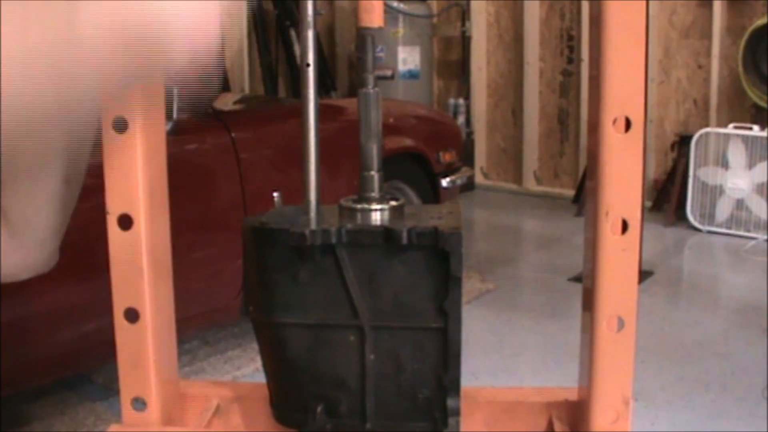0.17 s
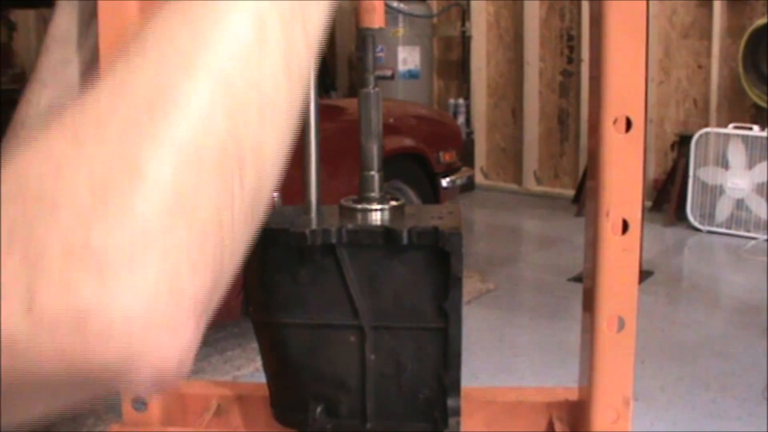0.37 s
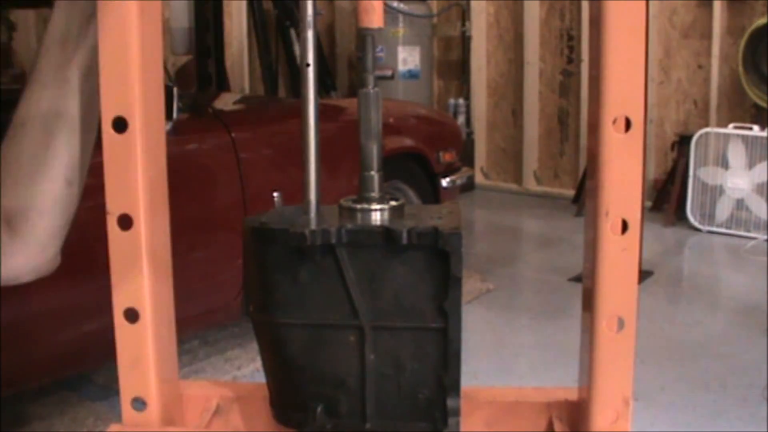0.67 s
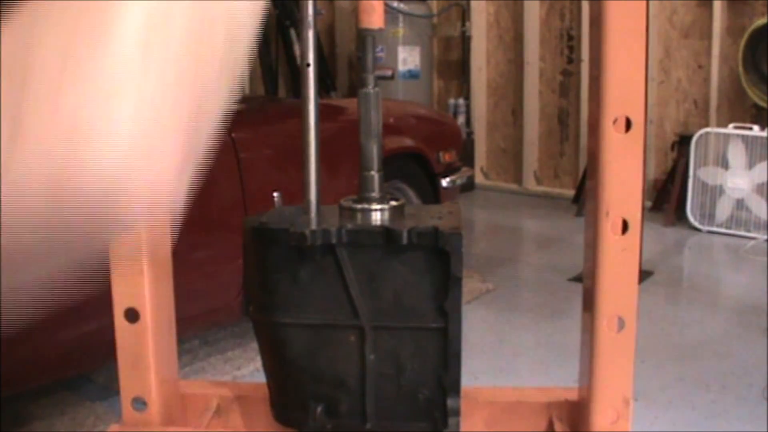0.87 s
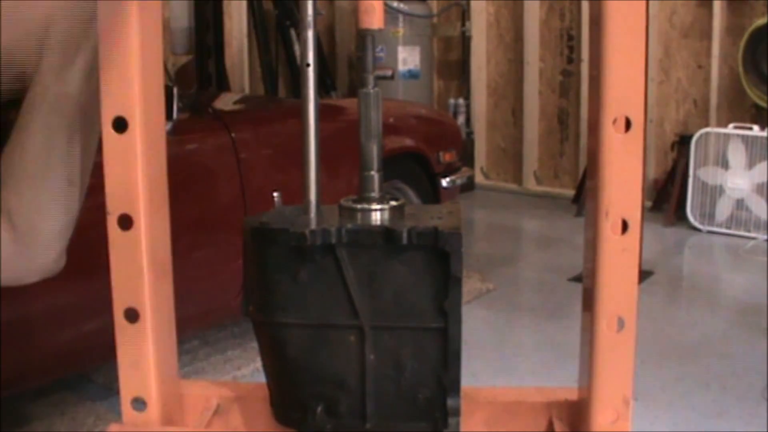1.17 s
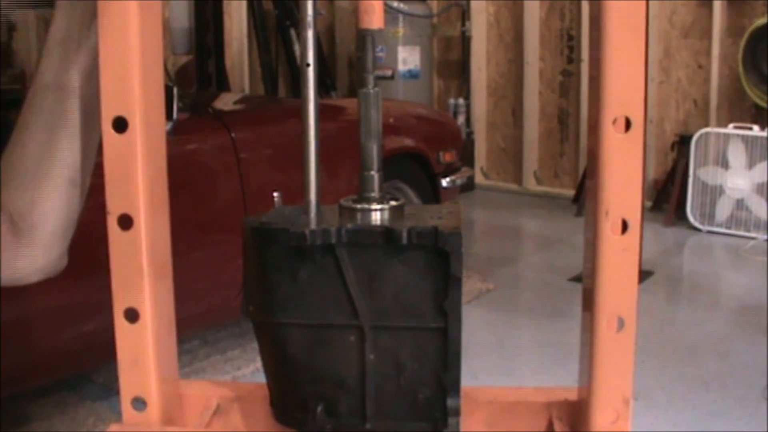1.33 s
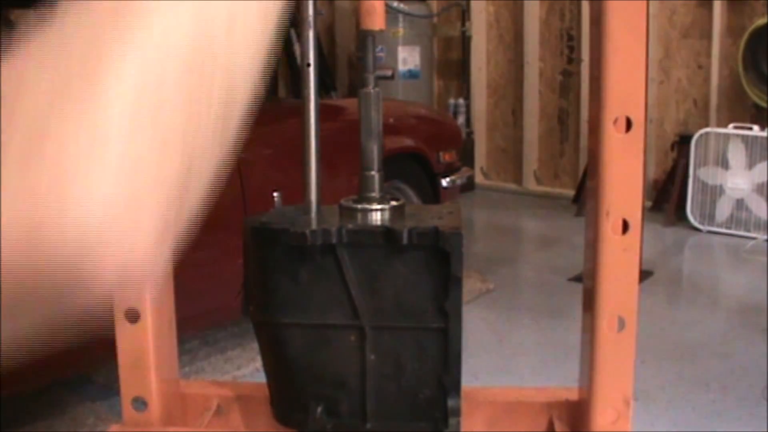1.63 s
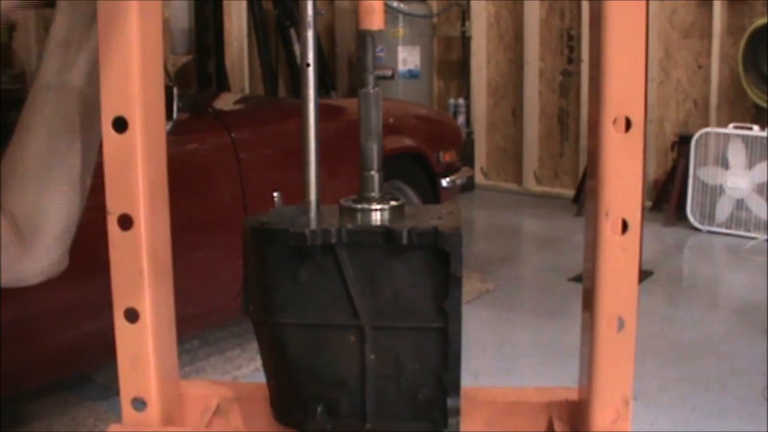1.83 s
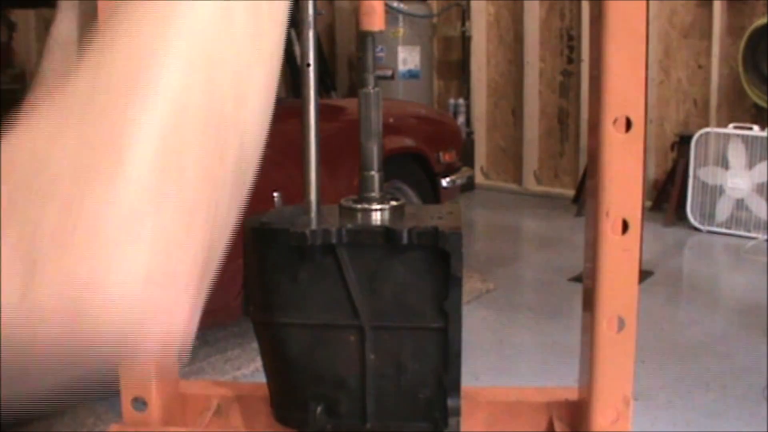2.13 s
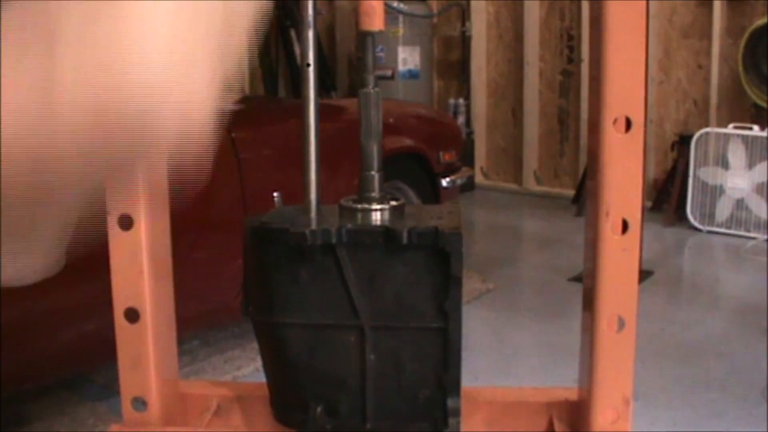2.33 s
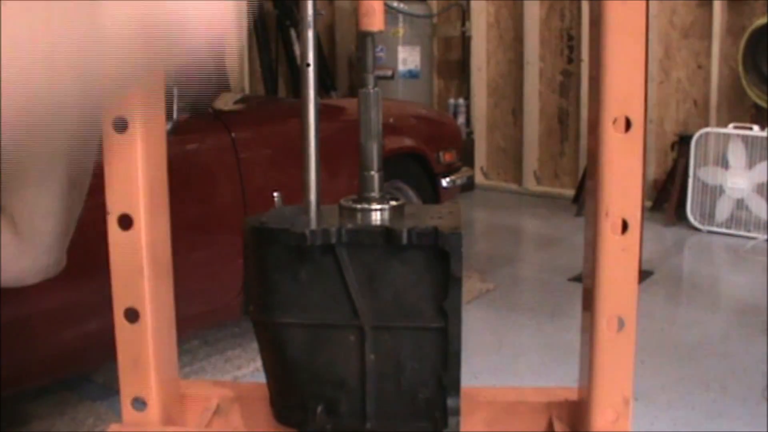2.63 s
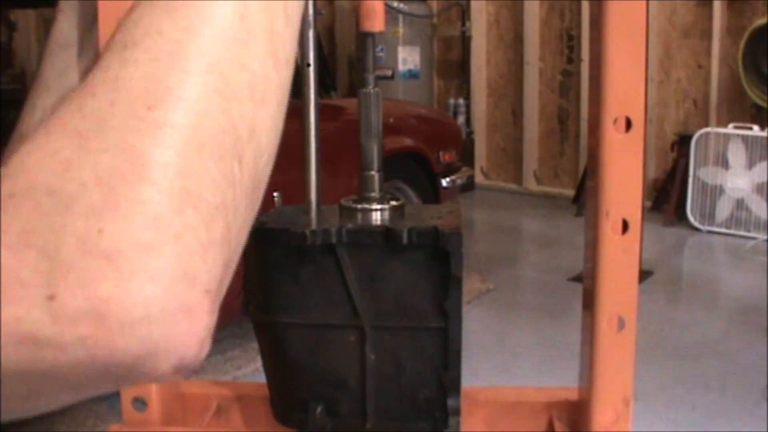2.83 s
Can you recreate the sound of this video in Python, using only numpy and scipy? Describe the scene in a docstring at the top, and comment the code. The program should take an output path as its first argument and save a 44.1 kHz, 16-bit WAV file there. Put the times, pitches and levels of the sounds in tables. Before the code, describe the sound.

A steel jack lever is pumped quickly by hand, each stroke a cluster of sharp clacks, ticks and scrapes with bright clanks at the turns, close to a small camera microphone in a garage.

```python
"""Bottle jack pumped by hand

A hand pumps the steel lever of a bottle jack in a shop press, in a garage, a small camera close by.
Loose linkage ticks, clacks and scrapes; the lever clanks at the turn of each stroke: coloured noise bursts.
Bursts feed a dense noise tail; a short pulse with each burst rings decaying steel modes.
A swept sine makes the low frame groan; filtered noise and drifting sines make the faint rumble and hum."""
import sys
import numpy as np
from scipy import signal
from scipy.fft import rfft, irfft
from scipy.io import wavfile
from scipy.ndimage import uniform_filter1d

SR = 44100
rng = np.random.default_rng(int(sys.argv[2]) if len(sys.argv) > 2 else 0)


def transcribe(u):
    """Save the signal u as a 16-bit wav file named by the first command-line argument.

    u: samples, shape (n,) or (channels, n), limited to [-1, 1]; the rate is SR.
    q: integer samples, one column per channel.
    """
    v = np.clip(np.atleast_2d(u).T, -1, 1)
    q = np.round(v * 32767).astype(np.int16)
    wavfile.write(sys.argv[1], SR, q)


N = 132300
LEAD = int(0.15 * SR)  # samples of run-in, cut off after the ringing is built

# Centres of the five colour bands [f/Hz]
BANDS_HZ = [500, 1400, 3600, 7800, 14500]
# Linkage ticks and clacks [t/s, direct crack peak/dB, relative ringing level/dB in five bands, decay/ms]
LINK_BLOWS = [(0.2127, -7, -28, -44, -27, -31, -72, 3.5), (0.2294, 1.5, -51, -26, -21.5, -4.5, -81, 1.5),
              (0.239, -7.5, -38, -56, -17, -60, -34, 2.5), (0.2536, -13, -22.5, -67, -21, -13, -29, 5.3),
              (0.2636, -3, -30.5, -11, -12, -18, -54, 1.6), (0.2815, -30, -31, -25, -46, -35, -62, 1.5),
              (0.5387, -10, -30, -22.5, -21, -16, -26.5, 11), (0.5664, -18, -33.5, -33, -25, -31, -43, 5.2),
              (0.7222, -17.5, -33, -38.5, -34.5, -35.5, -54, 4.0),
              (0.8108, -9.5, -35, -38, -35, -24.5, -63, 6.1), (0.84, 0, -53, -32.5, -19, -13, -53, 2.4),
              (0.8647, -1.5, -54, -42, -25.5, -25, -38, 4.8),
              (0.8731, -1, -24.5, -17.5, -14, -11, -26, 1.4),
              (1.1049, -13.5, -23.5, -34, -25.5, -30, -57, 2.6),
              (1.1357, -23, -40, -23, -32, -30, -44, 3.2), (1.1591, -7.5, -28, -23, -23, -16, -34, 2.2),
              (1.1922, -21, -60, -35, -29, -59, -61, 12), (1.2067, -8, -31, -34, -35, -20, -57, 1.9),
              (1.4274, -3.5, -28, -28, -23.5, -14.5, -66, 6.4),
              (1.4512, 3, -49, -34, -11.5, -9.5, -64, 1.33), (1.4561, -11.5, -28, -28, -31, -43, -34, 7.7),
              (1.4755, -11, -46, -7.5, -49, -8.5, -22, 4.0), (1.483, 2, -24, -25.5, -8, -8.5, -55, 1.3),
              (1.7324, -0.5, -54, -25, -28, -11, -64, 6.4), (1.7389, -21, -26.5, -38, -18.5, -11, -27, 1.3),
              (1.7524, -3.5, -59, -17, -17.5, -12.5, -22.5, 3.2),
              (1.8259, -14, -46, -27, -31, -28, -55, 1.7), (2.0118, -17, -55, -26.5, -27, -30, -37, 4.5),
              (2.0235, -9.5, -60, -53, -42, -25, -71, 2.4), (2.047, -1, -33.5, -30, -15.5, -18, -67, 5.2),
              (2.0664, -14, -29, -38, -55, -39, -39, 4.0), (2.0718, 2, -36, -40, -18, -7.5, -28.5, 2.4),
              (2.0821, -3, -20.5, -16.5, -21, -12.5, -21, 4.0), (2.364, -8, -56, -26, -21.5, -13, -35, 1.7),
              (2.3854, -13, -42, -18, -19.5, -17.5, -35, 5.7),
              (2.4396, -10.5, -32, -28.5, -28, -27.5, -41, 2.6), (2.601, -29, -64, -36, -48, -44, -72, 2),
              (2.6659, -37, -59, -23, -45, -36, -62, 1.3), (2.6751, -8.5, -29.5, -46, -30.5, -27, -60, 2.9),
              (2.7075, -5, -33, -27, -28, -13, -31, 6.2), (2.7134, -15, -22.5, -16.5, -14, -10, -29, 5.5),
              (2.972, -34, -30, -34, -42, -35, -63, 5.5)]
# Lever clanks at the turn of each stroke [t/s, crack peak/dB, five ringing levels/dB, decay/ms]
CLANK_BLOWS = [(0.3956, 0, -40, -44, -37, -44, -72, 4.5), (0.4016, -5, -20.5, -15.5, -6.5, -11.5, -46, 4.6),
               (1.0485, -8, -33.5, -25.5, -22, -30.5, -57, 8.4), (1.631, 1, -33, -24, -16.5, -24, -48, 5.6),
               (1.6369, -6, -18, -14, -7, -13.5, -44, 2.4), (2.2461, 0, -34, -17.5, -14.5, -17, -42, 8.8),
               (2.2521, -0.5, -18, -17.5, -10, -18.5, -45, 2)]
# Clack just before the start [t/s, crack peak/dB, five ringing levels/dB, decay/ms]
EARLIER_BLOWS = [(-.09, -12, -16, -17.5, -12.5, -9.5, -20, 3.5)]
# Scraping rattles of loose parts, slower to swell than the clacks
# [t/s, crack peak/dB, five ringing levels/dB, decay/ms]
SCRAPE_BLOWS = [(0.2094, -11.5, -53, -43, -33, -29, -61, 3.2), (0.246, -14, -50, -32, -24, -30, -39, 6.),
                (0.529, -14, -59, -34, -44, -38, -45, 10), (0.8078, -14.5, -55, -30, -30, -31, -51, 5.5),
                (0.853, -20, -55, -24, -24, -41, -50, 6.), (.880, -14, -45, -26, -32, -27, -50, 9.3),
                (1.149, -15, -44, -42, -44, -37, -41, 8.), (1.187, -24, -56, -44, -22, -44, -58, 7),
                (1.4255, -14, -56, -40, -34, -38, -46, 4.), (1.491, -29, -53, -32, -28, -38, -50, 9.),
                (2.012, -10.5, -55, -47, -35, -25, -64, 3.7), (2.378, -19, -50, -42, -35, -27, -47.5, 6.5),
                (2.6664, -9.5, -57.5, -40, -25, -29, -50, 2.7), (2.721, -9, -37, -27, -30, -23, -52, 29)]
# Steel modes of the linkage [f/Hz, relative level/dB, t60/s]
LINK_MODES = [(270.4, 9.5, 0.45), (454, -2.5, 0.58), (780, 8.5, 0.24), (1048, 5, 0.74), (1153, -4.5, 0.75),
              (1498, 7, 0.46), (1421, -3, 1), (1434, -1.5, 1), (2783, 10, 0.22), (3074, 10, 0.21),
              (3100, 8, 0.14), (3270, 11.5, 0.15), (3974, 9, 0.27), (4186, 10, 0.25), (4900, 10, .35),
              (6650, -15, 0.13), (7430, -13, 0.067), (8750, 19.5, 0.053), (10000, 11, 0.15)]
# Steel modes of the lever [f/Hz]
CLANK_MODES_HZ = [441, 1040, 1109, 1455, 1774, 1960, 2855, 3110, 3226, 3452, 3666, 4032, 4186, 4484, 5766,
                  8400]
# Ring of each lever mode [relative level/dB, t60/s]
CLANK_RING = [(-3, 0.49), (-5, 0.33), (-8.5, 0.72), (-7, 0.67), (6.5, 0.34), (-1.5, 0.42), (-2, 0.41),
              (-11, 0.25), (-8, 0.26), (4.5, .25), (-4.5, 0.16), (2.5, 0.29), (-8, 0.23), (-8.5, 0.63),
              (-1, 0.4), (-11, 0.24)]
# Dense ringing and room decay [f/Hz, t60/s]
TAIL_T60 = [(300, 0.6), (1400, 0.72), (3700, 0.57), (8000, 0.32), (13000, 0.34)]
# Low groan of the loaded frame [t/s, f/Hz, level/dB]
GROAN_TRACK = [(2.7, 289, -43), (2.75, 260, -35.5), (2.778, 292, -33), (2.896, 327, -45), (2.94, 231, -56),
               (2.95, 241.5, -67)]
# Room noise spectrum [f/Hz, relative level/dB per Hz]
FLOOR_SPECTRUM = [(18, -43), (30, -24.5), (210, 1), (345, 0), (801, -12), (1070, -22), (1220, 2.5),
                  (1430, -3), (1860, -14.5), (2830, -16.5), (4910, -16.5), (14800, -24), (16000, -44)]
# Hum tones [f/Hz, level/dB, line width/Hz]
HUM_TONES = [(39, -55, 4.4), (64, -57, 1.6), (103.8, -49.5, 2.36), (131, -52.5, 3.1), (433.7, -48.5, 4.7)]
# Stereo width: gain on the side signal [f/Hz, level/dB]
SIDE_COLOUR = [(60, -11), (250, -10.5), (700, -1.5), (3000, -1.5), (8000, -8), (13000, 0)]
# Microphone response [f/Hz, level/dB]
MICROPHONE = [(100, -7), (1500, -8), (2300, -10), (3300, -4), (4200, -4.5), (5500, -10), (8300, -5.5),
              (10300, -5), (12400, -19), (14000, -10), (15500, -5)]

RISE_MS, SCRAPE_RISE_MS = 0.82, 3.4
GRIT_DB = 3.5  # rms unevenness of a burst
BASS_CUT_DB = -11.5  # at 120 Hz, relative to the lowest band: blows carry little bass
CRACK_LO_HZ, CRACK_HI_HZ = 1300, 15600  # the direct crack is thin
TAIL_DB, LINK_MODES_DB, CLANK_MODES_DB = -6, -9, -7.5
TAIL_RISE_S = 0.0013
LINK_SHIMMER_HZ, CLANK_SHIMMER_HZ = 29.96, 28.57  # rms spread of the close partials in a mode
SHIMMER = 2.63  # weight of the close partials
SIDE_DB = -12  # side relative to mid, before SIDE_COLOUR
GROAN_ROUGH_DB = 2.0
FLOOR_DB, FLOOR_SIDE_DB = -41, -3.5
HISS_DB = -64.0
TOP_HZ = 15700


def undb(db):
    """Amplitude factor of a level in dB."""
    return 10 ** (np.asarray(db) / 20)


def unit(x):
    """Scale to unit rms along the last axis."""
    return x / np.sqrt(np.mean(x ** 2, axis=-1, keepdims=True))


def log_interp(hz, points):
    """Interpolate (Hz, value) points on a log frequency axis."""
    p = np.array(points)
    return np.interp(np.log(hz), np.log(p[:, 0]), p[:, 1])


def curve(points, n):
    """Values of (Hz, value) points at the bins of an n-sample transform."""
    return log_interp(np.arange(n // 2 + 1) * SR / n + 1, points)


def band(x, lo_hz, hi_hz):
    """Second-order Butterworth bandpass."""
    return signal.sosfilt(signal.butter(2, [lo_hz, hi_hz], "bandpass", fs=SR, output="sos"), x)


def blows(rows, modes, shimmer_hz, modes_db):
    """Each blow is a gritty coloured burst, heard direct and filling the tail;
    a short pulse of like colour rings the steel. Returns mid and side."""
    size, n, centre = 4096, N + LEAD, 128
    t_ms = np.arange(size) / SR * 1000
    widths_db = 10 * np.log10([700, 1300, 3300, 5500, 5000])  # band widths in Hz
    chance = rng.standard_normal((len(rows), 2, size))
    direct, rattle, push = np.zeros((3, n + size))
    for ((when_s, peak_db, *levels_db, decay_ms), rise_ms), (noise, grit) in zip(rows, chance):
        shape = (1 - np.exp(-t_ms / rise_ms)) * np.exp(-t_ms / max(decay_ms, 0.3))
        grit_gain = undb(GRIT_DB * unit(uniform_filter1d(grit, size=30)))
        burst = unit(noise * shape * grit_gain)

        per_hz_db = levels_db - widths_db
        colour_db = np.r_[per_hz_db[0] + BASS_CUT_DB, per_hz_db]
        colour = undb(curve(np.c_[[120] + BANDS_HZ, colour_db], size))
        hit = np.roll(irfft(rfft(burst) * colour, size), centre)
        start = int(when_s * SR) + LEAD - centre
        rattle[start:start + size] += hit

        # one short pulse of the same colour drives the modes
        pulse = np.roll(irfft(colour), centre)[:2 * centre] * np.hanning(2 * centre)
        push_start = start + int(rise_ms * SR / 1000)
        push[push_start:push_start + 2 * centre] += pulse * np.sqrt(size)

        crack = band(hit, CRACK_LO_HZ, CRACK_HI_HZ)
        direct[start:start + size] += crack * undb(peak_db) / np.abs(crack).max()

    tail = dense_tail()
    lines = steel_modes(modes, shimmer_hz, modes_db)
    ring = signal.fftconvolve(rattle[None], tail) + signal.fftconvolve(push[None], lines)
    mid, side = ring[:, :n]
    direct = direct[:n]
    direct_side = undb(SIDE_DB) * np.roll(direct, 9)  # delayed 9 samples
    return np.array([direct + mid, side + direct_side])[:, LEAD:]


def mid_side_gain():
    """Common gains of the mid and side responses."""
    return undb([[0], [SIDE_DB]]) / np.sqrt(20)


def steel_modes(modes, shimmer_hz, modes_db):
    """Mid and side response of steel: each decaying mode is a cluster of close partials that beat."""
    t = np.arange(SR) / SR
    lines = 0
    for hz, db, t60_s in modes:
        offsets_hz = rng.standard_normal((6, 1)) * shimmer_hz
        phases = rng.random((7, 2, 1)) * 2 * np.pi
        cluster = np.sin(2 * np.pi * hz * t + phases[-1])
        for offset_hz, phase in zip(offsets_hz, phases):
            cluster = cluster + SHIMMER / 2 * np.sin(2 * np.pi * (hz + offset_hz) * t + phase)
        lines = lines + undb(db) * cluster * np.exp(-np.log(1000) * t / t60_s)
    return undb(modes_db) * unit(lines) * mid_side_gain()


def dense_tail():
    """Mid and side response of dense ringing and room: half-octave noise bands, each with its own decay."""
    t = np.arange(SR) / SR
    tail = 0
    for hz in 220 * 2 ** np.arange(0, 6.4, 0.5):
        t60_s = log_interp(hz, TAIL_T60)
        fade = np.exp(-np.log(1000) * t / t60_s) * (1 - np.exp(-t / TAIL_RISE_S))
        noise = band(rng.standard_normal((2, SR)), hz / 2 ** 0.25, hz * 2 ** 0.25)
        tail = tail + noise * fade / np.sqrt(t60_s)
    return undb(TAIL_DB) * unit(tail) * mid_side_gain()


def groan():
    """Loaded frame: a low sine of gliding pitch, its level roughened by 19-55 Hz noise."""
    t = np.arange(N) / SR
    when_s, hz, db = np.array(GROAN_TRACK).T
    gate = np.interp(t, [when_s[0] - 0.02, when_s[0], when_s[-1], when_s[-1] + 0.082], [0, 1, 1, 0])
    phase = 2 * np.pi * np.cumsum(np.interp(t, when_s, hz)) / SR
    rough = undb(GROAN_ROUGH_DB * unit(band(rng.standard_normal(N), 19, 55)))
    level = np.sqrt(2) * undb(np.interp(t, when_s, db))
    return level * gate * rough * np.sin(phase)


def garage():
    """Mid and side of the room: spectrally shaped noise, plus hum sines whose phase wanders at random."""
    air = irfft(rfft(rng.standard_normal((2, N))) * undb(curve(FLOOR_SPECTRUM, N)), N)
    wide = signal.sosfilt(signal.butter(1, 150, "highpass", fs=SR, output="sos"), air[1])
    room = np.array([air[0], wide * undb(FLOOR_SIDE_DB)]) * undb(FLOOR_DB) / np.std(air[0])
    t = np.arange(N) / SR
    for hz, db, width_hz in HUM_TONES:
        drift = np.cumsum(rng.standard_normal(N)) * np.sqrt(2 * np.pi * width_hz / SR)
        room[0] += np.sqrt(2) * undb(db) * np.sin(2 * np.pi * hz * t + drift)
    return room


def scene():
    """Sum the sources as mid and side, colour the side, decode to left and right."""
    clank_rows = [(row, RISE_MS) for row in CLANK_BLOWS]
    link_rows = [(row, RISE_MS) for row in list(LINK_BLOWS) + list(EARLIER_BLOWS)]
    link_rows += [(row, SCRAPE_RISE_MS) for row in SCRAPE_BLOWS]
    clank_modes = np.c_[CLANK_MODES_HZ, CLANK_RING]

    clank = blows(clank_rows, clank_modes, CLANK_SHIMMER_HZ, CLANK_MODES_DB)
    link = blows(link_rows, LINK_MODES, LINK_SHIMMER_HZ, LINK_MODES_DB)
    mid, side = link + clank + garage()
    mid = mid + groan()
    side = irfft(rfft(side) * undb(curve(SIDE_COLOUR, N)), N)
    return np.array([mid + side, mid - side])


def record(dry):
    """Camera microphone: colours, hisses faintly, cuts the bottom, rounds high peaks, cuts the top."""
    taps = np.roll(irfft(undb(curve(MICROPHONE, 1024))), 64)[:128] * np.hanning(128)
    heard = signal.fftconvolve(dry, taps[None], mode="same")
    heard = heard + undb(HISS_DB) * rng.standard_normal(dry.shape)
    heard = signal.sosfilt(signal.butter(6, 38, "high", fs=SR, output="sos"), heard)
    rounded = np.tanh(heard)
    return signal.sosfilt(signal.ellip(8, 0.2, 60, TOP_HZ, fs=SR, output="sos"), rounded)


dry = scene()
out = record(dry)
transcribe(out)
```